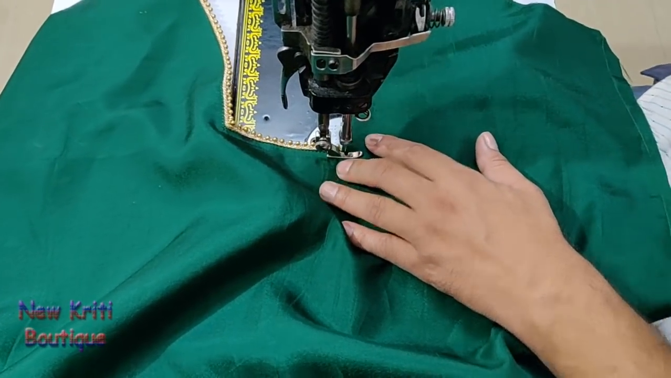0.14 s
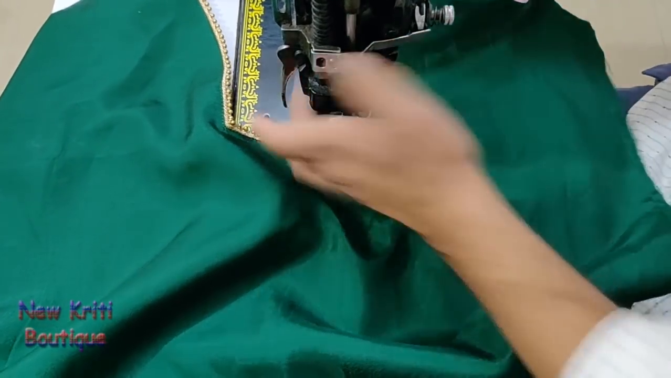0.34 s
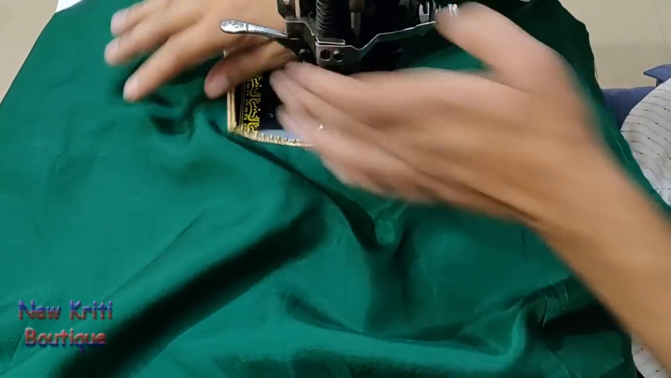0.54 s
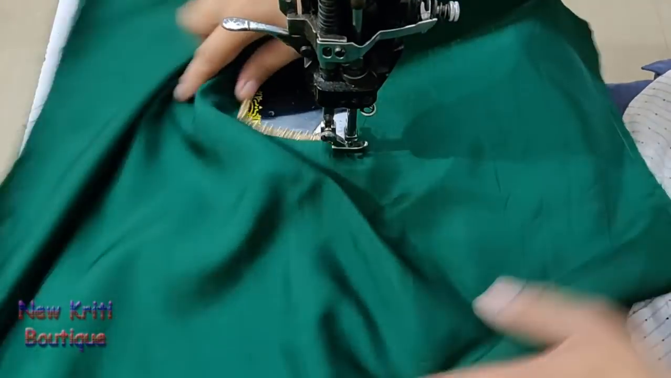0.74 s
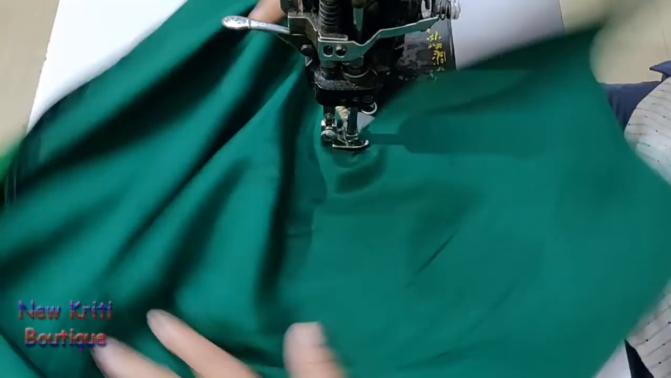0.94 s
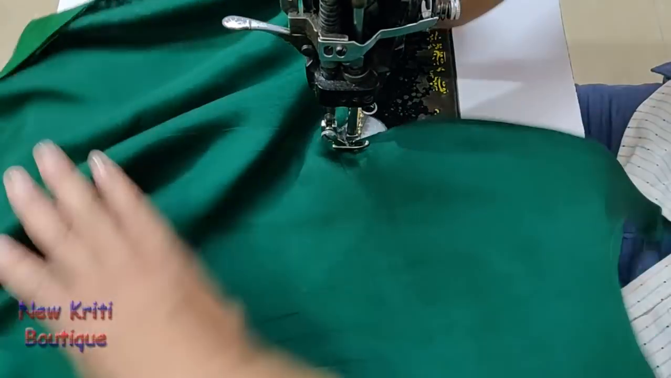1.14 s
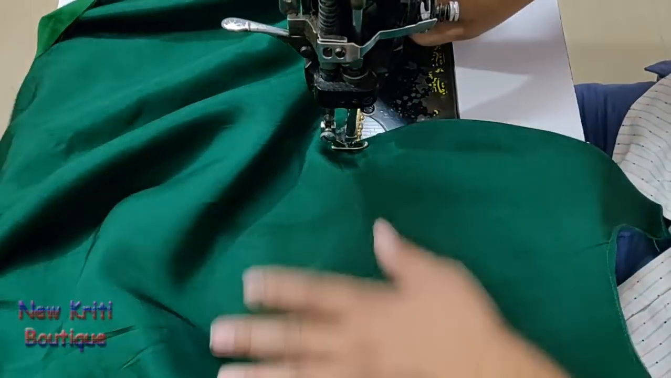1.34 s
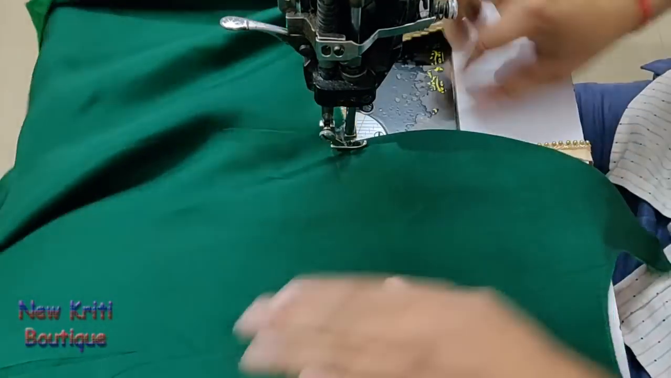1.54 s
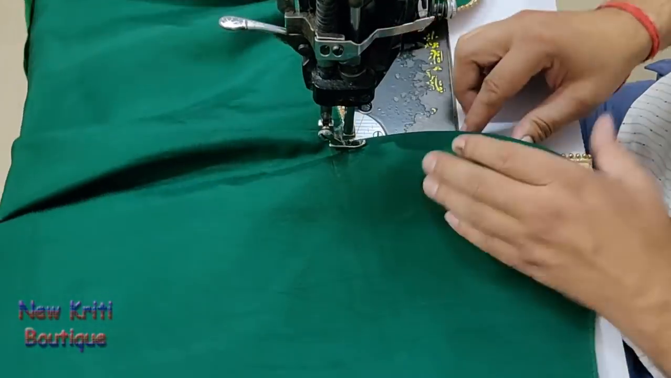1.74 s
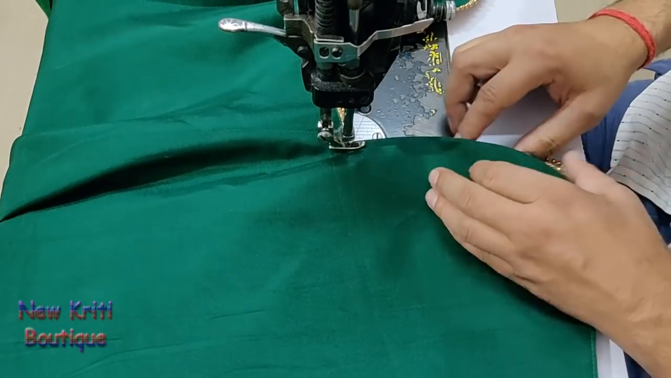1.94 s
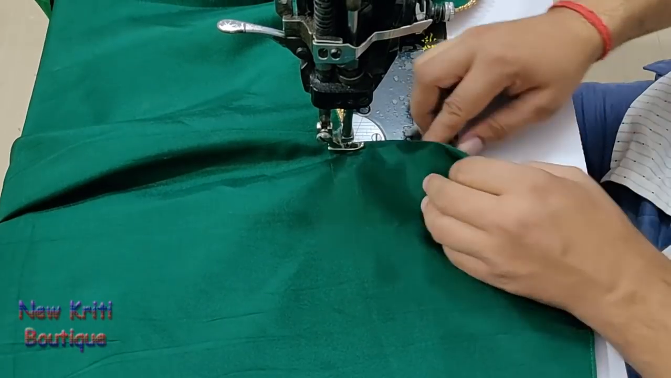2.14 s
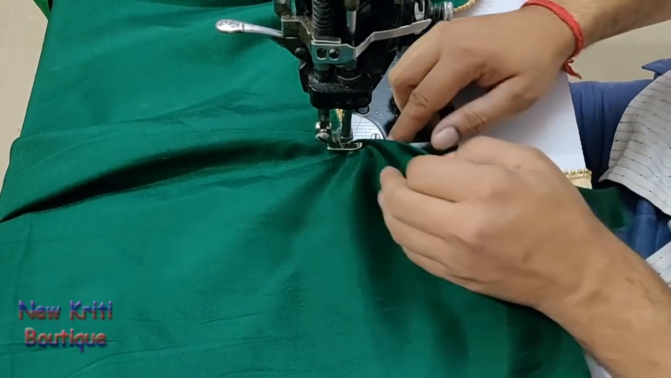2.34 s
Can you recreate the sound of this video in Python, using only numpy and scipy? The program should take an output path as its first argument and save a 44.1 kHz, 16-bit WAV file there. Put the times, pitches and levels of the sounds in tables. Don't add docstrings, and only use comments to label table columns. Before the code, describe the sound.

A sewing machine lever clacks twice in quick succession with a woody thump, then hands slide and turn smooth cloth over the table, with faint ticks and small knocks, close stereo microphone in a quiet room.

```python
import sys
import numpy as np
from scipy import signal
from scipy.io import wavfile

SR = 44100
rng = np.random.default_rng(int(sys.argv[2]) if len(sys.argv) > 2 else 0)


def pcm_store(signal):
    levels = np.round(np.clip(np.atleast_2d(signal), -1, 1) * 32767)
    wavfile.write(sys.argv[1], SR, levels.astype(np.int16).T)


def gain_from_db(level_db):
    decades = np.asarray(level_db, float) / 20
    return 10 ** decades


N = 110250

# start_s, level_db
HAND_DRAG = [(0.0, -49), (0.26, -67.5), (0.37, -41), (0.44, -48), (0.51, -48), (0.67, -52), (0.91, -55),
             (1.2, -54.5), (1.38, -47), (1.51, -44), (1.71, -54.5), (2.08, -56), (2.2, -57), (2.5, -62)]
# freq_hz, level_db_per_hz
RUMBLE_SPECTRUM = [(15, -44), (25, -18), (64, -8), (129, -3), (231, -5), (338, -3), (466, -9.5), (558, -12),
                   (3000, -27), (3900, -54), (6600, -120)]
# start_s, level_db
CLOTH_SLIDE = [(0, -69.5), (.18, -68.5), (.45, -62.5), (.56, -59), (.65, -55.5), (.9, -62), (1.05, -67),
               (1.25, -60.5), (1.55, -62), (1.7, -71), (1.83, -64), (1.88, -56.5), (1.97, -58), (2.01, -65),
               (2.11, -63), (2.16, -55), (2.21, -71.5), (2.5, -68)]
# freq_hz, level_db_per_hz
CLOTH_SPECTRUM = [(290, -52), (500, -6.5), (690, -15.5), (1640, -16.5), (2940, -19), (6860, -21),
                  (15100, -27.5), (15800, -22), (16500, -47)]
# start_s, crack_db, ring_db, ring_hz, left_over_right_db
METAL_TICKS = [(0.188, -32, -50, 4730, -5), (0.2036, -9, -14, 14600, -2.5), (0.2381, -7, -18.5, 14160, -4),
               (.4205, -43, -39, 6800, 3), (1.1938, -43, -40, 6440, 4), (1.3987, -49, -47, 4470, 3),
               (1.5154, -20.5, -30, 7020, 1), (1.6148, -43.5, -38.5, 8210, -10.5),
               (1.7691, -44.5, -38.5, 7400, -0.5), (2.0242, -37, -46, 12140, -4),
               (2.1307, -43, -46, 13500, -2), (2.144, -48, -61, 9350, -5), (2.439, -52, -56, 4400, 2)]
# freq_hz, level_db_per_hz
CRACK_SPECTRUM = [(1470, -24), (2500, -2), (4180, -5), (6650, 0), (11500, -4), (14500, -3), (16500, -14)]
# start_s, peak_db, contact_cutoff_hz
TABLE_BUMPS = [(0.191, -30.5, 630), (.205, -13, 2310), (0.2386, -13, 3240), (.5597, -28.5, 706),
               (.945, -53.5, 1090), (1.0952, -49, 292), (1.1908, -25.5, 1490), (1.1942, -45.5, 2860),
               (1.33, -44, 910), (1.3998, -30.5, 1110), (1.515, -40, 905), (1.6371, -38, 447),
               (2.401, -43, 780)]
# freq_hz, level_db, t60_s
BODY_MODES = [(183.4, -8, 0.57), (216.4, -13.5, 0.44), (299.3, 2, 0.21), (328.5, -1.5, 0.19),
              (384.4, 1, 0.18), (442, -8, 0.28), (520.7, -8.5, 0.31), (553, -6.5, 0.26), (605, -7, 0.28),
              (1044, -16.5, 0.2), (1300, -11.5, 0.21), (1327, -15, 0.34), (1391, -14, 0.29)]
# freq_hz, t60_s
ROOM_DECAY = [(100, 0.32), (260, 0.42), (700, 0.36), (1840, 0.33), (4850, 0.3), (12800, 0.27)]
# freq_hz, level_db
ECHO_SPECTRUM = [(100, -2), (1000, 4.5), (6500, 3), (11000, 2.5), (16000, -5.5)]
# start_s, level_db, t60_s
TABLE_SWAYS = [
    (0.199, -20, 0.13),
    (.42, -32.5, 0.2),
    (1.196, -33, 0.38),
    (1.409, -43.5, 0.46),
]
# start_s, length_s, pitch_hz, width_hz, level_db
CLOTH_SQUEAKS = [
    (1.43, 0.34, 2250, 120, -56.5),
    (1.88, 0.083, 2550, 28, -61.5),
    (1.4, 0.22, 153, 28, -50.5),
    (1.09, 0.11, 570, 37, -61),
]
# freq_hz, left_right_likeness
STEREO_LIKENESS = [(30, 1), (70, 0.89), (150, 0.93), (400, 0.85), (800, 0.27), (1500, -0.0076),
                   (3000, -0.12), (8000, 0.1)]
# freq_hz, width_hz, gain
MIC_PORTS = [(6800, 1170, 0.7), (14600, 2300, 0.92)]

FIBRES_PER_S = 4600
CRACK_DECAY_S, RING_T60_S = 0.0017, 0.0052
KNOCK_DB, KNOCK_RISE_S, KNOCK_DECAY_S, MODES_DB = -2, 0.0022, 0.0066, -9
BUMP_ECHO_DB, TICK_ECHO_DB, RING_ECHO_DB, FIRST_ECHO_S = -3, -4.5, -8, 0.0036
SWAY_HZ, SWAY_RISE_S = 88.9, 0.0099
BASS_CUT_HZ, TOP_CUT_HZ, TOP_LEAK_DB = 58, 16500, 35


def rms_one(x):
    return x / np.sqrt(np.mean(x ** 2) + 1e-20)


def in_time(rows):
    return np.interp(np.arange(N) / SR, *np.transpose(rows))


def at_hz(points, hz):
    freq_hz, value = np.array(points).T
    return np.interp(np.log(hz), np.log(freq_hz), value)


def drift(rate_hz):
    r = np.exp(-80 * np.pi * rate_hz / SR)
    white = rng.standard_normal(N // 40 + 2002)
    slow = signal.lfilter([1], [1, -2 * r, r * r], white)[2000:]
    return np.interp(np.arange(N) / 40, np.arange(len(slow)), rms_one(slow))


def ring(x, hz, t60_s):
    r = gain_from_db(-60 / (t60_s * SR))
    w = 2 * np.pi * hz / SR
    return signal.lfilter([0, np.sin(w)], [1, -2 * r * np.cos(w), r * r], x + 1e-18)


def bands(white, gain):
    out = 0
    edges_hz = 24 * 2 ** np.arange(0, 9.6, 0.5)
    for k, (low_hz, high_hz) in enumerate(zip(edges_hz, edges_hz[1:])):
        band = signal.butter(2, [low_hz, high_hz], "band", fs=SR, output="sos")
        mid, side = signal.sosfilt(band, white[k % 2])
        hz = np.sqrt(low_hz * high_hz)
        alike = np.clip(at_hz(STEREO_LIKENESS, hz), -1, 1)
        stereo = np.sqrt(1 + alike) * mid + np.sqrt(1 - alike) * side * [[1], [-1]]
        out = out + gain(hz) * stereo
    return out


def add(out, x, start_s):
    i = int(start_s * SR)
    out[..., i:i + x.shape[-1]] += x[..., :N - i]


def rumble():
    together_db = 0.84 * drift(8)

    def gain(hz):
        return gain_from_db(at_hz(RUMBLE_SPECTRUM, hz) + together_db + 2.9 * drift(10)) * (hz < 3000)

    low = bands(rng.standard_normal((2, 2, N)), gain)
    return gain_from_db(in_time(HAND_DRAG) + 1.27) * rms_one(low)


def cloth():
    snaps = (rng.random(N) < FIBRES_PER_S / SR) * rng.exponential(1, N)
    grain = 1 + 0.88 * snaps
    together_db = 0.37 * drift(6.7)

    def gain(hz):
        return gain_from_db(at_hz(CLOTH_SPECTRUM, hz) + together_db + 0.72 * drift(11)) * (hz > 400)

    swish = bands(rng.standard_normal((2, 2, N)) * grain, gain)
    return gain_from_db(in_time(CLOTH_SLIDE) + 2.78) * rms_one(swish)


def ticks():
    cracks, rings = np.zeros((2, N)), np.zeros((2, N))
    t = np.arange(2048) / SR
    for start_s, crack_db, ring_db, ring_hz, pan_db in METAL_TICKS:
        burst = rng.standard_normal((2, 2, len(t))) * np.exp(-t / CRACK_DECAY_S)
        pan = gain_from_db([[pan_db / 2], [-pan_db / 2]])
        crack = bands(burst, lambda hz: gain_from_db(at_hz(CRACK_SPECTRUM, hz)))
        tone = ring(burst[0], ring_hz, RING_T60_S)
        add(cracks, gain_from_db(crack_db) * pan * crack / abs(crack).max(), start_s)
        add(rings, gain_from_db(ring_db) * pan * tone / abs(tone).max(), start_s)
    return cracks, rings


def bumps():
    out = np.zeros(N)
    t = np.arange(SR // 2) / SR
    strikes_db = rng.normal(0, 3.0, (len(TABLE_BUMPS), len(BODY_MODES)))
    for (start_s, peak_db, cutoff_hz), strike_db in zip(TABLE_BUMPS, strikes_db):
        dull = signal.butter(2, [150, cutoff_hz], "band", fs=SR, output="sos")
        rough = rms_one(signal.sosfilt(dull, rng.standard_normal(len(t))))
        knock = rough * np.exp(-t / KNOCK_DECAY_S) * np.minimum(t / KNOCK_RISE_S, 1)
        push = signal.sosfilt(signal.butter(2, cutoff_hz, fs=SR, output="sos"), t == 0)
        body = np.zeros(len(t))
        for (hz, mode_db, t60_s), change_db in zip(BODY_MODES, strike_db):
            body += gain_from_db(mode_db + change_db) * ring(push, hz, t60_s)
        add(out, gain_from_db(peak_db) * (gain_from_db(KNOCK_DB) * knock + gain_from_db(MODES_DB) * body), start_s)
    return out


def room(x):
    t = np.arange(SR // 2) / SR

    def decay(hz):
        return gain_from_db(at_hz(ECHO_SPECTRUM, hz) - 60 * t / at_hz(ROOM_DECAY, hz))

    tail = bands(rng.standard_normal((2, 2, len(t))), decay)
    tail = tail * np.clip(t / FIRST_ECHO_S - 1, 0, 1)
    tail = tail / np.sqrt(np.sum(tail ** 2) / 2)
    return signal.fftconvolve(x, tail, axes=1)[:, :N]


def sways():
    out = np.zeros(N)
    t = np.arange(SR // 2) / SR
    boom = (1 - np.exp(-t / SWAY_RISE_S)) * np.sin(2 * np.pi * SWAY_HZ * t)
    for start_s, level_db, t60_s in TABLE_SWAYS:
        add(out, gain_from_db(level_db - 60 * t / t60_s) * boom, start_s)
    return out


def squeaks():
    out = np.zeros(N)
    for start_s, length_s, pitch_hz, width_hz, level_db in CLOTH_SQUEAKS:
        t60_s = 1.5 / width_hz
        tone = ring(ring(rng.standard_normal(SR // 2), pitch_hz, t60_s), pitch_hz, t60_s)
        u = np.arange(SR // 2) / SR / length_s
        swell = np.clip(np.minimum(u / 0.052, (1 - u) / 0.61), 0, 1)
        add(out, gain_from_db(level_db) * rms_one(tone) * swell, start_s)
    return out


def scene():
    wood = bumps() * np.ones((2, 1))
    cracks, rings = ticks()
    metal_send = gain_from_db(TICK_ECHO_DB) * (cracks + gain_from_db(RING_ECHO_DB) * rings)
    echoes = room(gain_from_db(BUMP_ECHO_DB) * wood + metal_send)
    hits = wood + sways() + cracks + rings + echoes
    return hits + cloth() + rumble() + squeaks()


def roll_off(x):
    return signal.sosfilt(signal.butter(12, 17670, fs=SR, output="sos"), x)


def record(dry):
    x = dry
    for hz, width_hz, gain in MIC_PORTS:
        x = x + gain * signal.lfilter(*signal.iirpeak(hz, hz / width_hz, SR), dry)
    x = signal.sosfilt(signal.butter(2, BASS_CUT_HZ, "high", fs=SR, output="sos"), x)
    x = signal.sosfilt(signal.cheby2(12, TOP_LEAK_DB, TOP_CUT_HZ, fs=SR, output="sos"), x)
    return roll_off(x)


dry = scene()
out = record(dry)
pcm_store(out)
```